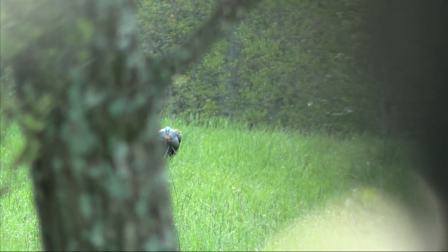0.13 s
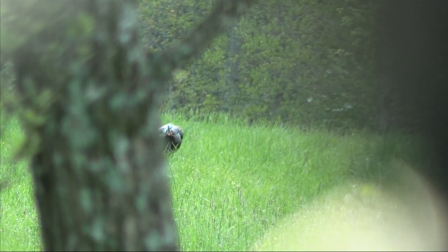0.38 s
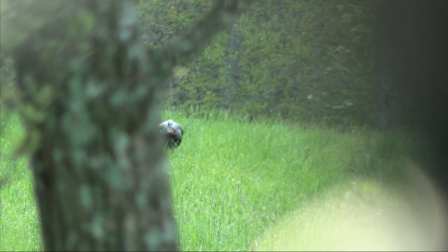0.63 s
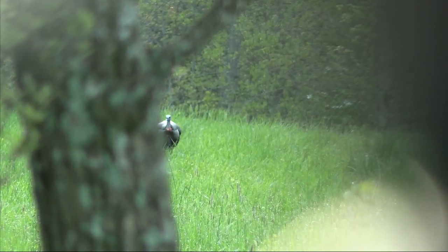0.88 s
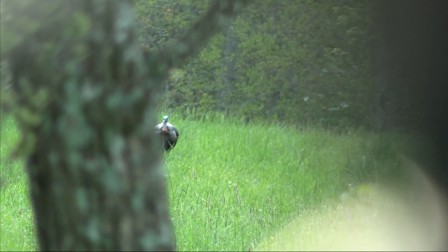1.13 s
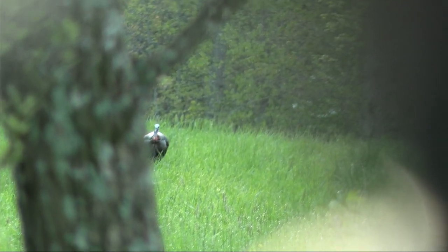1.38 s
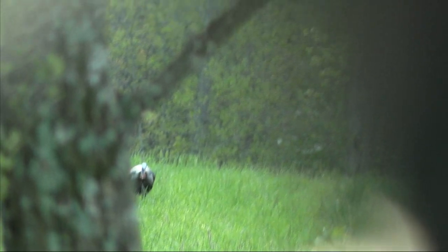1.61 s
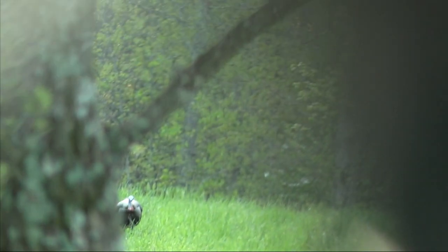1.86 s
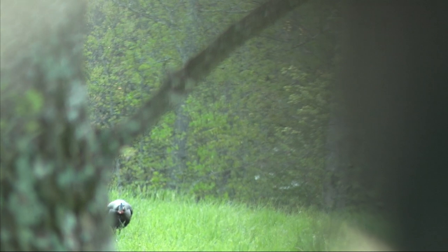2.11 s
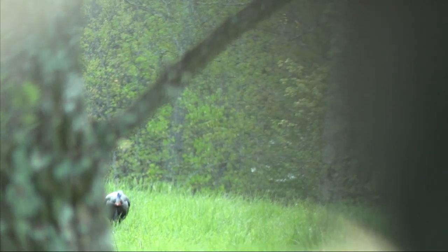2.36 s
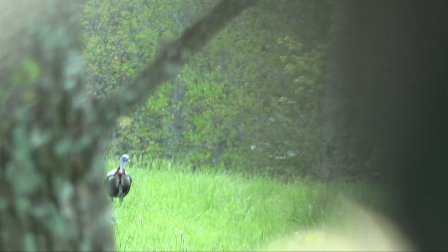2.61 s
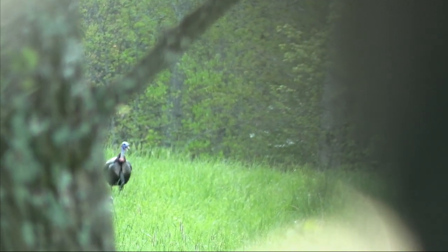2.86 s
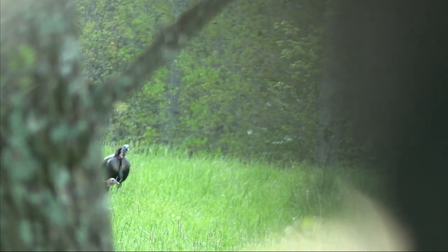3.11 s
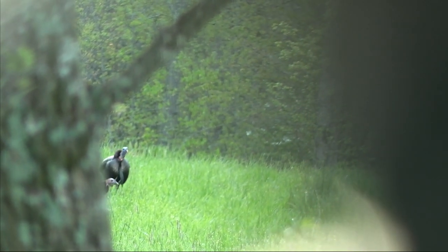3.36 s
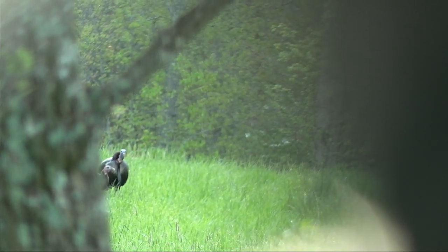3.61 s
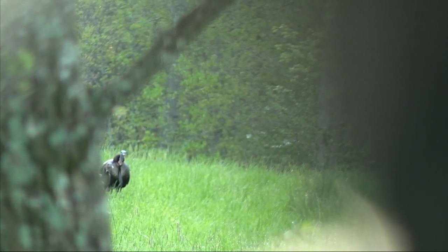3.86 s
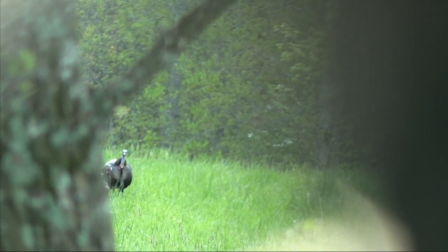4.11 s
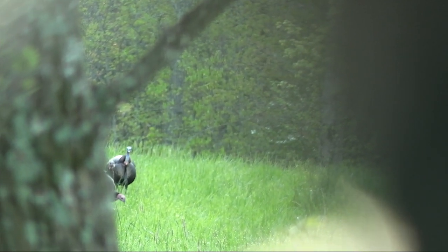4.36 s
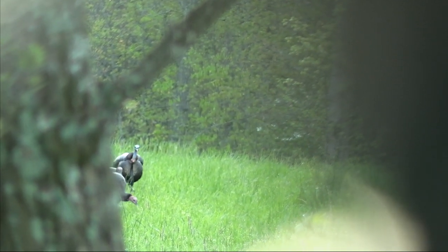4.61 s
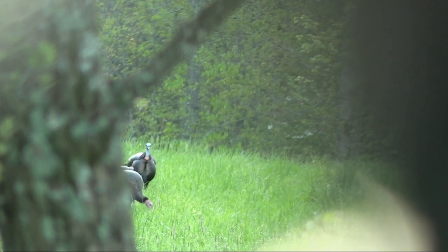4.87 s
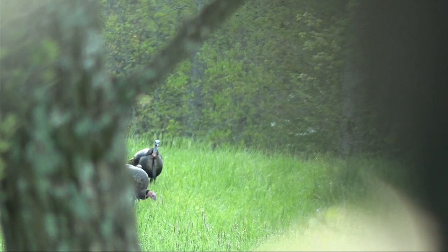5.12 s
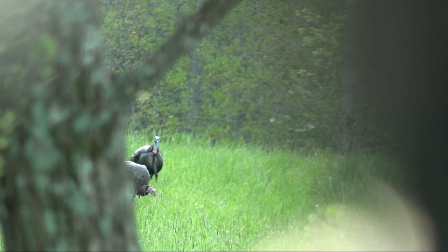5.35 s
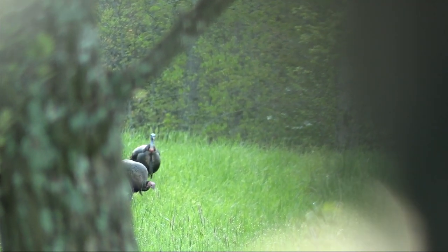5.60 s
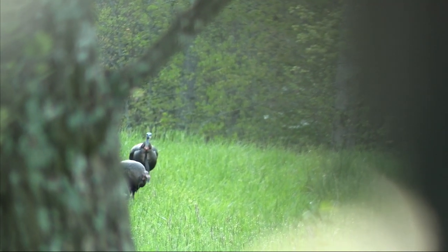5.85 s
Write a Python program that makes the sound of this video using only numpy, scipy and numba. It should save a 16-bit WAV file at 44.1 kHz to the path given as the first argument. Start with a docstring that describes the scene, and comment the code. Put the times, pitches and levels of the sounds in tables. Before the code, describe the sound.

Small birds call first: a quick warble on the left, a repeated rising note on the right, thin high whistles in the middle. Then a single turkey gobble bursts out in the centre, rough and fast, dying away over about a second with tree echoes. Chirps and swooping far notes follow, ending in a dry insect-like bird buzz. Open field at a wood's edge, distant stereo pickup, hiss and low rumble.

```python
"""A meadow at the edge of a wood, where a wild turkey gobbles once some way off.
The gobble is a train of rough pulses and noise puffs filtered by moving throat resonances.
Songbirds left and right are fluttering sines (whistles, warbles) and noise bands (buzzes).
A far chorus is a crowd of short glides; hiss and a low distant drone are filtered noise.
The trees throw every call back as sparse, decaying echoes."""
import sys
import numpy as np
from scipy import signal
from scipy.io import wavfile
from scipy.ndimage import uniform_filter1d
from numba import njit

SR = 44100
rng = np.random.default_rng(int(sys.argv[2]) if len(sys.argv) > 2 else 0)


def convert_level_to_amplitude(level_db):
    """Map a level in decibels to its linear amplitude factor."""
    exponent = np.asarray(level_db, float) / 20
    return 10 ** exponent


def to_wav(s):
    """Save 16-bit WAV."""
    ch = np.atleast_2d(s).T  # columns
    pcm = np.round(np.clip(ch, -1, 1) * 32767)  # PCM
    wavfile.write(sys.argv[1], SR, pcm.astype(np.int16))


N = 263718  # length in samples

# interchannel phase of a sound from ahead: (frequency [Hz], lead of left over right [rad])
PHASE_AHEAD = [(2300, 0.94), (3400, -1.2), (4000, -0.7), (5400, 0.76), (6400, 0.77)]


def evened(x):
    """Normalisation by energy: scales to rms 1."""
    return x / np.sqrt(np.mean(x ** 2) + 1e-20)


def read(points, hz):
    """Spectral interpolation: reads a table along log frequency."""
    f, value = np.transpose(points)
    return np.interp(np.log(hz + 1), np.log(f + 1), value)


def columns(rows):
    """Linear interpolation: the curves of a table whose first column is time, at sample rate."""
    s, *rest = np.transpose(rows)
    t = np.arange(s[0], s[-1], 1 / SR)
    return [np.interp(t, s, c) for c in rest]


def wander(count, size):
    """Low-passed noise: slow chance of rms 1, averaged twice over size samples."""
    once = uniform_filter1d(rng.standard_normal(count), size)
    return evened(uniform_filter1d(once, size))


def add(mix, s, sound, pan_db):
    """Superposition with a level difference: mixes in at time s, left of centre for positive pan."""
    part = mix[:, round(s * SR):][:, :sound.shape[-1]]
    panned = sound * convert_level_to_amplitude([[0.5 * pan_db], [-0.5 * pan_db]])
    part += panned[:, :part.shape[1]]


@njit
def smooth(z, r):
    """Recursive averaging: a one-pole low-pass whose pole may move."""
    out, last = np.empty_like(z), 0j
    for n in range(len(z)):
        last = r[n] * last + (1 - r[n]) * z[n]
        out[n] = last
    return out


def resonate(x, hz, width):
    """Resonance by heterodyning: shifts hz down to zero, smooths twice, shifts back, at gain 1."""
    turn = np.exp(2j * np.pi * np.cumsum(hz * np.ones(x.shape[-1])) / SR)
    pole = np.exp(-np.pi * width / SR) * np.ones(len(x))
    return 2 * (turn * smooth(smooth(x / turn, pole), pole)).real


def pulses(hz, jitter, anchors):
    """Relaxation oscillation: a click at every unsteady turn, in step at each anchor sample."""
    turns = np.cumsum(hz * np.exp(jitter * wander(len(hz), size=300))) / SR
    nearest = np.searchsorted((anchors[1:] + anchors[:-1]) // 2, np.arange(len(hz)))
    turns = turns - turns[anchors[nearest]]
    new_turn = np.diff(np.floor(turns), prepend=0) == 1
    same_anchor = np.diff(nearest, prepend=0) == 0
    return (new_turn & same_anchor) * 1., turns % 1


def gobble():
    """Source and filter: rough pulses, syllable by syllable, excite moving throat resonances."""
    # syllables: (time [s], peak level [dB], upper resonance against the lower [dB])
    syllables = [(3.165, -20.5, 2), (3.235, -12.5, -14), (3.278, -33.5, -22), (3.313, -24, -24),
                 (3.342, -24, -5), (3.384, -21.5, 1), (3.423, -22.5, 5.5), (3.453, -23.5, 4.5),
                 (3.488, -29, -7), (3.53, -22.5, 2), (3.575, -27.5, 3), (3.624, -27, -4), (3.671, -32, 0),
                 (3.704, -26, 4), (3.739, -27, -1), (3.768, -38.5, -1), (3.801, -29.5, 1.5),
                 (3.887, -29, 2), (3.915, -33, -4), (3.971, -30, 1.5), (4.029, -32, -0.5),
                 (4.055, -34, -19), (4.09, -34, -6), (4.123, -34, 6.5), (4.19, -50.5, -3),
                 (4.226, -45, -17), (4.255, -37.5, -10), (4.332, -39, -5), (4.365, -37, -16),
                 (4.411, -39, -25)]
    # voice: (time [s], mean pulse rate [Hz], roughness [0-1], lower and upper resonance
    # before the beak lifts them [Hz, Hz])
    voice = [(3.15, 551, 0.4, 1080, 1540), (3.175, 559, 0.5, 1250, 1685), (3.195, 171.6, 0.7, 1350, 1780),
             (3.25, 159.5, 0.59, 1367, 1470), (3.325, 84.8, 0.54, 1220, 1590), (3.355, 93, 0.3, 1300, 2030),
             (3.4, 105, 0.62, 1110, 1907), (3.47, 118.3, 0.65, 1090, 1740), (3.57, 118.2, 0.5, 1200, 1630),
             (3.66, 119.6, 0.49, 990, 1646), (4.0, 80.35, 0.48, 954, 1650), (4.45, 74.3, 0.48, 895, 1610)]
    # rasp bands: (frequency [Hz], width [Hz], level among the bands [dB])
    rasp_bands = [(2850, 1080, 5), (3470, 790, -0.5), (4150, 690, -5), (6250, 3300, -18)]
    hz, rough, low, high = columns(voice)
    age = np.arange(len(hz)) / SR
    t = voice[0][0] + age

    wide_hz, narrow_hz, settle_s = 308, 215, 0.2  # the resonances narrow as the call settles
    width = narrow_hz + (wide_hz - narrow_hz) * np.exp(-age / settle_s)
    chest_db = -31 + 21.5 * (1 - np.exp(-age / 0.3))  # the chest joins in late

    s, effort_db, high_db = np.transpose(syllables)
    wait_s = np.minimum(np.diff(s, append=t[-1]), 0.055)
    # a syllable lasts longer when loud, or when the next is slow to come
    length = 0.04 + 0.3 * wait_s + 0.0007 * (effort_db + 28)
    u = np.clip((t[:, None] - s + 0.015) / length, 0, 1)  # share of each syllable gone by
    swell = convert_level_to_amplitude(effort_db - 10.5) * np.sin(np.pi * u ** 0.91) ** 1.6  # rms lies under the peak
    total_swell = swell.sum(1)

    anchors = ((s + 0.53 * length - 0.024 - t[0]) * SR).astype(int)  # near each syllable's top
    clicks, phase = pulses(hz, 0.069, anchors)
    clicks *= convert_level_to_amplitude(1.0 * wander(len(t), size=100)) / np.sqrt(hz)  # no two pulses alike
    puffs = (0.4 + np.exp(-phase / 0.35)) * rng.standard_normal(len(t))
    rough = np.clip(rough, 0, 1)
    drive = (1 - rough) * evened(clicks) + rough * evened(puffs)

    # the beak opens through each syllable and lifts the resonances
    opening = (swell * (u - 0.45)).sum(1) / (total_swell + 1e-4)
    low, high = low * (1 + 0.21 * opening), high * (1 + 0.15 * opening)

    def ring(hz, width):
        """Cascaded resonance: a narrow peak on a wide skirt, at rms 1."""
        narrow = resonate(drive, hz, 1.1 * width)
        return evened(resonate(narrow, hz, 870) / np.sqrt(width))

    third, chest = convert_level_to_amplitude(-9.5) * ring(1884, 290), convert_level_to_amplitude(chest_db) * ring(601, 87)
    lower = ring(low, width) + third + chest
    upper = (swell * convert_level_to_amplitude(high_db)).sum(1) * ring(high, 0.68 * width)

    rasp = sum((-1) ** k * convert_level_to_amplitude(db) * resonate(puffs + 0.28 * drive, f, w)
               for k, (f, w, db) in enumerate(rasp_bands))
    # a wide open beak lifts upper resonance and rasp together: dB of rasp per dB
    rasp_follows = 0.44
    height = np.sin(np.pi * u ** 1.23)  # keeps the rasp to the height of a syllable
    surge = (swell * convert_level_to_amplitude(rasp_follows * high_db) * height).sum(1)
    call = total_swell * lower + surge * convert_level_to_amplitude(-3) * evened(rasp) - upper

    mix = np.zeros((2, N))
    add(mix, voice[0][0], call, 0.3)
    return mix


def swelling(count, top, ends_db):
    """Parabolic envelope: level in dB along a note whose top comes at a share of its length."""
    u, top = np.linspace(0, 1, count), np.clip(top, 0, 1)
    return ends_db * ((u - top) / max(top, 1 - top)) ** 2


def slide(length, from_hz, to_hz):
    """Geometric glide: equal musical intervals in equal times."""
    return np.geomspace(from_hz, to_hz, int(length * SR))


def whistle(hz, db, phase_table):
    """Frequency modulation: a near sine whose level flutters on its way through the leaves."""
    flutter_db = 3.03 * wander(len(hz), size=160)
    phase = 2 * np.pi * np.cumsum(hz) / SR
    tone = np.sqrt(2) * np.sin(phase + np.outer([0.5, -0.5], read(phase_table, hz)))
    return convert_level_to_amplitude(db + flutter_db) * tone * signal.windows.tukey(len(hz), min(1, 600 / len(hz)))


def note(hz, db, top, phase_table=PHASE_AHEAD, ends_db=-2):
    """Amplitude envelope: a whistle with a 4 ms start, lower at the end farther from its top."""
    start = np.minimum(np.arange(len(hz)) / SR / 0.004, 1)
    return whistle(hz, db + swelling(len(hz), top, ends_db), phase_table) * start


def warbler(mix):
    """Rapid frequency modulation: a near bird on the left, louder as its pitch rises."""
    # notes: (level at 3300 Hz [dB], turning points of the pitch (time [s], frequency [Hz]))
    warbles = [ (-38.5, [(1.078, 3356), (1.09, 3620), (1.1, 3050), (1.12, 2580), (1.14, 3150),
               (1.157, 4150), (1.172, 4300), (1.188, 3540), (1.212, 4750)]), (-35.5, [(1.264, 5090),
               (1.28, 3500), (1.3, 2850), (1.328, 2370), (1.35, 2800), (1.37, 3450), (1.385, 2800),
               (1.405, 2520)]), (-48, [(4.005, 3800), (4.035, 2900)]), (-37, [(4.035, 2900), (4.052, 4120),
               (4.075, 4100), (4.084, 4350), (4.092, 4165), (4.105, 3650), (4.13, 2530)]),
               (-35.5, [(4.17, 2366), (4.195, 2797), (4.25, 2757), (4.262, 3340), (4.275, 4400)]),
               (-47, [(5.81, 2120), (5.82, 2510), (5.835, 3050), (5.862, 3860)]), ]
    # phase from far left: (frequency [Hz], lead of left over right [rad])
    phase_left = [(2400, 1.9), (3200, 0.6), (4300, 3)]
    for db, turns in warbles:
        hz = uniform_filter1d(columns(turns)[0], size=480, mode="nearest")  # rounded turns
        level_db = db + 6 * np.log2(hz / 3300)  # 6 dB per octave
        add(mix, turns[0][0], note(hz, level_db, 0.59, phase_left, ends_db=-5), 7.5)


def held_whistles(mix):
    """Quasi-periodic tones: level whistles whose pitch is slightly unsteady."""
    # (start [s], length [s], mean frequency [Hz], level [dB], left over right [dB])
    held = [(.26, .1, 2580, -52, -5), (.68, .12, 2295, -55, 5), (1.465, 0.14, 1760, -53.5, 6),
            (1.564, 0.091, 2420, -44.5, 3), (1.721, .045, 2310, -47.5, -3), (1.791, 0.15, 2270, -45, -3),
            (2.318, 0.28, 3965, -47.5, 4), (3.091, 0.21, 3468, -43.5, -4), (3.799, 0.16, 2340, -45.5, -7),
            (4.666, 0.075, 3300, -56, -2), (4.69, 0.078, 6295, -51.5, -3), (5.642, 0.12, 2320, -44, -11.5),
            (5.8, 0.053, 2280, -47, -5)]
    for s, length, hz, db, pan_db in held:
        unsteady = 1 + 0.0025 * wander(int(length * SR), size=600)
        add(mix, s, note(slide(length, hz, hz) * unsteady, db, 0.37), pan_db)


def sliding_notes(mix):
    """Frequency glides: short notes ahead, rising or falling."""
    # (start [s], length [s], from [Hz], to [Hz], level [dB])
    slides = [(0, .05, 2470, 3900, -51), (1.608, 0.062, 4870, 5100, -53), (1.648, 0.072, 2580, 2760, -52),
              (2.799, 0.038, 3210, 3470, -47.5), (2.83, 0.067, 3420, 3060, -50.5),
              (3.017, 0.082, 3310, 3460, -47), (4.266, 0.063, 2790, 2670, -51),
              (4.329, 0.028, 2700, 2100, -49), (4.332, 0.056, 6300, 5860, -54),
              (4.448, 0.041, 3200, 3630, -48), (4.482, 0.037, 3610, 3060, -48)]
    for s, length, from_hz, to_hz, db in slides:
        add(mix, s, note(slide(length, from_hz, to_hz), db, 0.65), 0)


def seeps(mix):
    """Exponential relaxation of pitch: thin high notes that drop onto a slow sag."""
    # (start [s], length [s], from [Hz], onto a sag that begins at [Hz], level [dB])
    seep_notes = [(1.889, 0.342, 7700, 6620, -51.5), (2.68, 0.28, 6800, 6610, -50)]
    drop_hz_per_s, sag_hz_per_s = 25000, 980
    for s, length, from_hz, onto_hz, db in seep_notes:
        t = np.arange(0, length, 1 / SR)
        drop = from_hz - onto_hz
        hz = onto_hz + drop * np.exp(-t * drop_hz_per_s / drop) - sag_hz_per_s * t
        add(mix, s, note(hz, db, 0.55, ends_db=-3.5), 0)


def chips(mix):
    """Saturating frequency rise: short chips on the right that shoot up, then sag."""
    # (start [s], length [s], top before the sag [Hz], level [dB])
    chip_notes = [(4.12, 0.028, 5900, -55), (4.482, .065, 5820, -46), (4.858, .065, 6000, -50)]
    below, rise_s, sag_hz_per_s = 0.133, 0.013, 9800  # starts this share under its top
    for s, length, top_hz, db in chip_notes:
        t = np.arange(0, length, 1 / SR)
        hz = top_hz * (1 - below * np.exp(-t / rise_s) + 0.012 * wander(len(t), size=200))
        add(mix, s, note(hz - sag_hz_per_s * t, db, 0.27, ends_db=-12), -7)


def repeater(mix):
    """Periodic repetition: a bird on the right gives one rising note again and again."""
    # (time after start [s], frequency [Hz], level against the whole note [dB])
    rising_note = [(0, 2013, -8), (.03, 2200, -2), (.052, 2323, -0.5), (.068, 2290, -1), (.082, 1850, -26)]
    from_s, every_s, count, note_db = 1.38, 0.1546, 11, -48
    hz, shape_db = columns(rising_note)
    for k in range(count):
        add(mix, from_s + k * every_s, whistle(hz, note_db + shape_db, PHASE_AHEAD), -12)


def buzz(top_db, hz):
    """Sidebands about a carrier: noisy lines at a pulse-rate spacing, broader when fainter."""
    # lines: (multiple of the spacing [1], level among the lines [dB])
    sidebands = [(-1, -17), (0, -3), (1, -4), (2, -7.5), (3, -8), (4, -19)]
    spacing_hz = 256
    width = np.clip(40 * convert_level_to_amplitude(-1.6 * (top_db + 43)), 30, 300)
    noise = rng.standard_normal(len(hz))
    lines = sum(convert_level_to_amplitude(level_db) * evened(resonate(noise, hz + k * spacing_hz, width))
                for k, level_db in sidebands)
    shape_db = swelling(len(hz), 0.74, -11.5)
    return convert_level_to_amplitude(top_db + shape_db) * evened(lines) * signal.windows.tukey(len(hz), 0.15)


def buzzes(mix):
    """Gliding carriers: buzzy high-pitched trills that swell to a top and die, a little right."""
    # (start [s], length [s], level at the top [dB], carrier from [Hz], to [Hz])
    trills = [(0.118, .48, -58.5, 6780, 6750), (0.862, 0.25, -52, 5960, 6400),
              (1.771, 0.153, -55, 6140, 6540), (4.95, 0.18, -56, 6350, 6310),
              (5.783, 0.32, -41, 6240, 6080)]
    for s, length, top_db, from_hz, to_hz in trills:
        add(mix, s, buzz(top_db, slide(length, from_hz, to_hz)), -3.5)


def songbirds():
    """Superposition: every note that stands out of the chorus."""
    mix = np.zeros((2, N))
    for bird in (warbler, held_whistles, sliding_notes, seeps, chips, repeater, buzzes):
        bird(mix)
    return mix


def deep():
    """Frequency modulation at a distance: wavering far notes, and notes that swoop and level out."""
    # a bird deep in the wood: (start [s], length [s], from [Hz], to [Hz], level before the mix [dB])
    wavering = [(1.021, 0.029, 2295, 2440, -38), (1.228, .024, 2036, 1800, -47),
                (1.455, .02, 3550, 3750, -45), (1.976, 0.027, 3700, 3530, -43.5),
                (4.357, 0.043, 2260, 2480, -47), (5.189, 0.044, 2700, 1974, -42),
                (5.36, 0.051, 1850, 2500, -39), (5.42, 0.042, 2380, 3100, -38.5),
                (5.469, 0.063, 3130, 2900, -50.5), (5.575, .04, 3900, 2600, -45),
                (5.61, .035, 2795, 1760, -42), (5.932, 0.047, 2595, 3770, -48)]
    # swoops: (start [s], length [s], from [Hz], onto [Hz], level before the mix [dB])
    falls = [(4.34, .045, 4440, 2610, -45), (4.562, .07, 4380, 2930, -48),
             (4.782, 0.057, 4480, 3470, -46.5), (4.925, 0.084, 4430, 2487, -47.5)]
    mix = np.zeros((2, N))
    for s, length, from_hz, to_hz, db in wavering:
        hz = slide(length, from_hz, to_hz)
        hz = hz * (1 + 0.032 * wander(len(hz), size=150))
        add(mix, s, whistle(hz, db, PHASE_AHEAD), -1.5)
    for s, length, from_hz, onto_hz, db in falls:
        t = np.arange(0, length, 1 / SR)
        hz = onto_hz + (from_hz - onto_hz) * np.exp(-(t / 0.035) ** 1.5)
        add(mix, s, note(hz, db, 0.6), -2.5)
    return mix


def chorus(count=1400):
    """Incoherent summation: short steep glides of many far birds blur into chatter."""
    # (time [s], level before the mix [dB], drifting centre [Hz])
    chatter = [(0.0, -53, 2503), (0.48, -49.5, 2714), (0.98, -49, 2590), (1.08, -41.5, 2693),
               (1.86, -41, 2357), (2.11, -44.5, 2330), (2.53, -40.5, 2577), (2.8, -46, 2474),
               (3.05, -41.5, 2820), (3.399, -35, 2796), (3.88, -45.5, 2407), (4.16, -38.5, 2750),
               (4.58, -56, 2690), (4.98, -72, 2690), (5.48, -47, 2580), (5.61, -38.5, 2704),
               (5.72, -46, 2700), (5.98, -43.5, 2483)]
    s, level_db, centre = np.transpose(chatter)
    mix = np.zeros((2, N))
    for when, spread, skew, steepness, length, loud, side in rng.random((count, 7)):
        start_s = when * N / SR
        u = np.linspace(0, 1, int((0.00987 + 0.01993 * length) * SR))
        offset = 0.34 * (spread + skew - 0.9)
        glide = 0.548 * (steepness - 0.35) * (u - 0.5)
        hz = np.interp(start_s, s, centre) * np.exp(offset + glide)
        chirp = np.sin(2 * np.pi * np.cumsum(hz) / SR) * np.sin(np.pi * u)
        add(mix, start_s, convert_level_to_amplitude(21.4 * loud) * chirp, 14 * (side - 0.5))
    return evened(mix) * convert_level_to_amplitude(np.interp(np.arange(N) / SR, s, level_db))


def trees(x):
    """Scattering: sparse echoes of random sign, each band dying at its own speed."""
    # (frequency [Hz], time to fall by 60 dB [s])
    decay = [(800, 1), (2500, 0.66), (7000, 0.34)]
    taps = np.zeros((2, SR))
    first, every = 1100, 20  # samples
    slots = np.arange(first, SR - every, every)
    at = slots + rng.integers(0, every, (2, len(slots)))
    np.put_along_axis(taps, at, rng.choice([-1., 1.], at.shape), 1)
    hz, t, z = signal.stft(taps, SR, nperseg=256)
    tail = signal.istft(z * convert_level_to_amplitude(-60 * t / read(decay, hz)[:, None]), SR, nperseg=256)[1]
    return signal.fftconvolve(x, tail / np.linalg.norm(tail[0]), axes=1)[:, :N]


def air():
    """Partly coherent noise: hiss and far rumble from random spectra, most alike in the low bass."""
    # spectrum: (frequency [Hz], relative level per Hz [dB])
    spectrum = [(21, -43), (36, -14.5), (159, -4), (281, -11), (637, -6.5), (796, -2.5), (901, -8.5),
                (1070, -6.5), (1480, -8), (2040, -11.5), (2680, -9.5), (4620, -15), (6530, -18),
                (11800, -31.5), (13400, -45)]
    # the far rumble swells and sinks: (time [s], change below 1100 Hz [dB])
    rumble = [(0, 3), (1.5, 1.76), (3.5, 3), (4.3, 1.54), (5.98, 1.1)]
    # coherence: (frequency [Hz], left-right likeness [0-1])
    likeness = [(60, 0.93), (130, 1), (280, 0.85), (600, 0.62), (1300, 0.19), (2810, 0.23), (6060, 0.44),
                (13100, 0.89)]
    # balance: (frequency [Hz], left over right [dB])
    balance = [(60, 0.5), (230, -2), (890, 0.5), (3400, 0), (13100, -2.5)]
    # phase: (frequency [Hz], lead of left over right [rad])
    phase_air = [(300, 0), (430, .1), (800, .9), (1000, -2.0), (1300, 2.0), (1700, .7), (2800, .3),
                 (3500, .6), (6500, .15), (9000, .08), (13000, 0)]
    frames, hz = N // 512 + 5, np.fft.rfftfreq(2048, 1 / SR)
    a, b, c, d, patches = rng.standard_normal((frames, 1025, 5)).T
    patches = uniform_filter1d(patches, size=20, axis=0)  # along frequency
    patches = evened(uniform_filter1d(patches, size=10, axis=1))  # along time

    same = np.clip(read(likeness, hz), -1, 1)[:, None]
    left = a + 1j * b
    shared = same * left * np.exp(-1j * read(phase_air, hz))[:, None]
    right = shared + np.sqrt(1 - same ** 2) * (c + 1j * d)

    rumble_db = np.interp(np.arange(frames) * 512 / SR, *np.transpose(rumble))
    level_db = read(spectrum, hz)[:, None] + 1.16 * patches + rumble_db * (hz < 1100)[:, None]
    side_db = np.outer([0.5, -0.5], read(balance, hz))[..., None]
    z = np.array([left, right]) * convert_level_to_amplitude(level_db + side_db)
    noise = signal.istft(z, nperseg=2048, noverlap=1536)[1][:, :N]
    return convert_level_to_amplitude(-42) * evened(noise)


def drone():
    """Narrow-band noise: a distant engine as fuzzy low bands, the same in both channels."""
    # (frequency [Hz], width [Hz], level [dB])
    bands = [(42.4, 8, -70), (85, 13.5, -62), (153.9, 19.6, -57), (170.4, 6.5, -56.5), (800, 190, -62)]
    noise = rng.standard_normal(N)
    return sum(convert_level_to_amplitude(db) * evened(resonate(noise, hz, width)) for hz, width, db in bands)


def scene():
    """Direct and reflected sound: turkey ahead, birds around, each with its share of echoes."""
    turkey, birds, far = gobble(), songbirds(), chorus() + deep()
    echoes = trees(convert_level_to_amplitude(-5.5) * turkey + convert_level_to_amplitude(-10) * birds + convert_level_to_amplitude(-7) * far)
    echoes += 0.19 * echoes[::-1]  # the far tree line lies ahead of both channels
    return turkey + birds + convert_level_to_amplitude(-5.5) * far + echoes + air() + drone()


def band_limit(x):
    """A steep low-pass at the top of the band."""
    return signal.sosfilt(signal.butter(12, 13670, fs=SR, output="sos"), x)


def record(dry):
    """High-pass filtering: the microphone's bass cut at 38 Hz."""
    bass_cut = signal.butter(4, 38, "high", fs=SR, output="sos")
    return band_limit(signal.sosfilt(bass_cut, dry))


dry = scene()
out = record(dry)
to_wav(out)
```